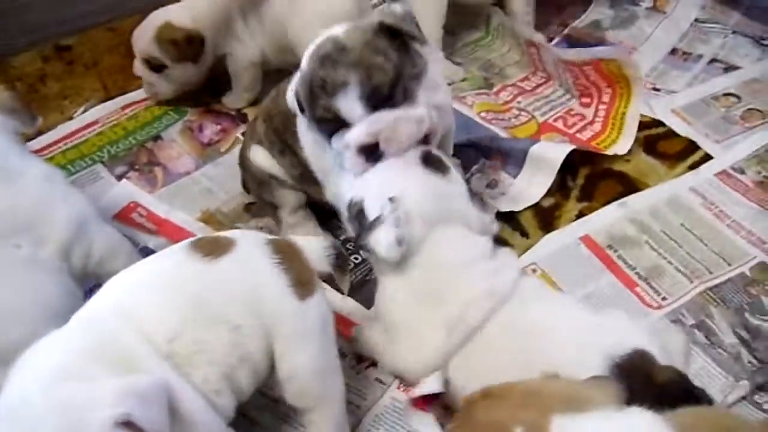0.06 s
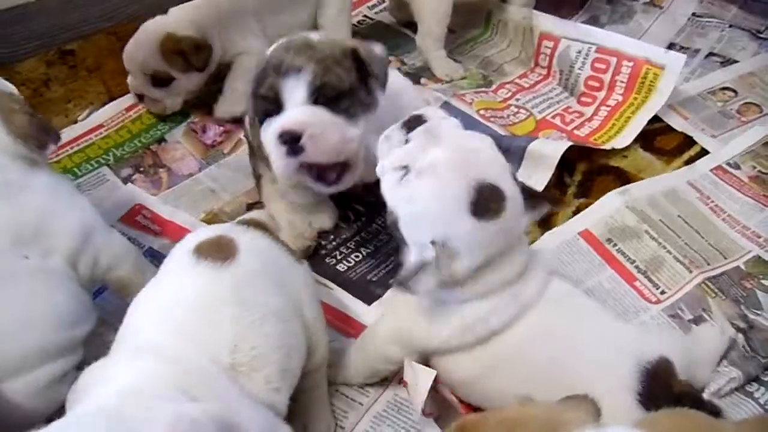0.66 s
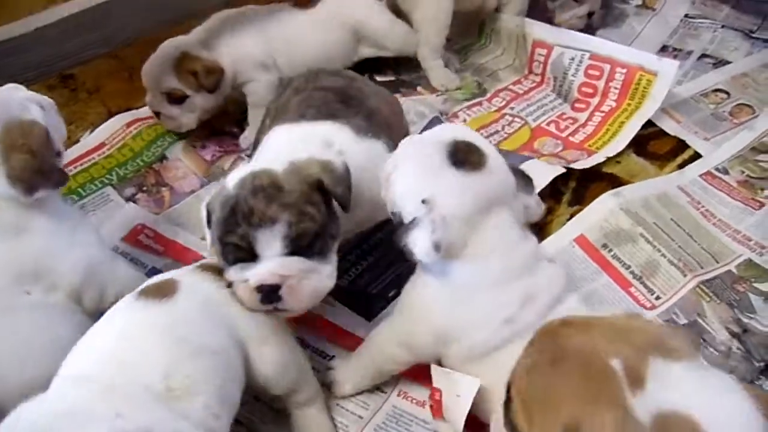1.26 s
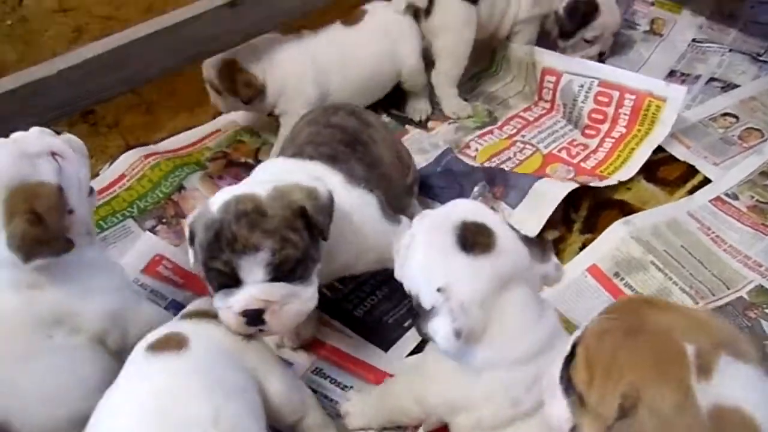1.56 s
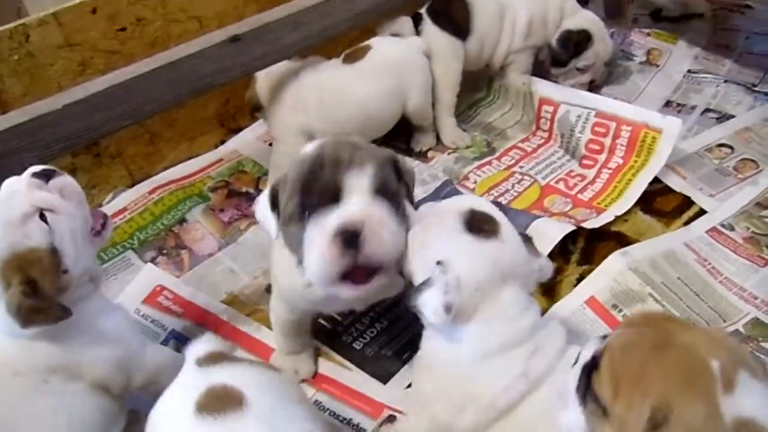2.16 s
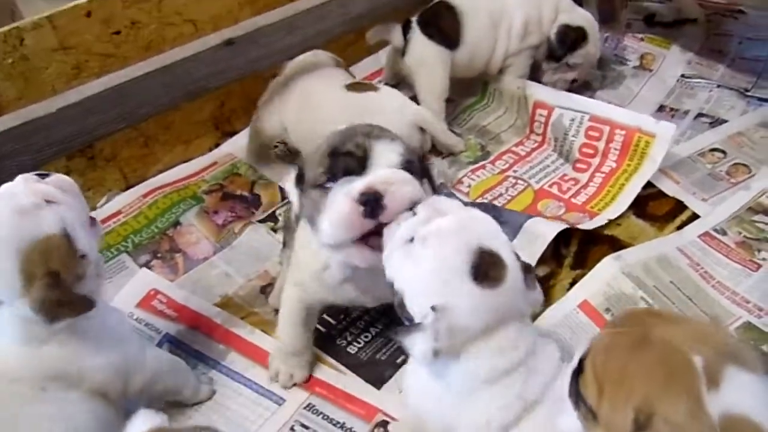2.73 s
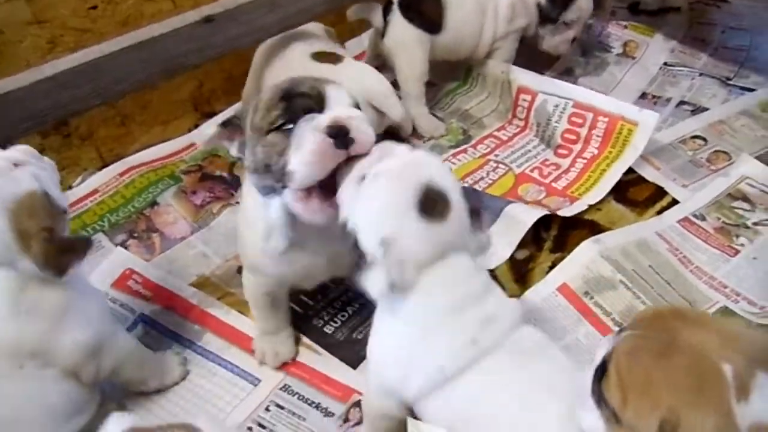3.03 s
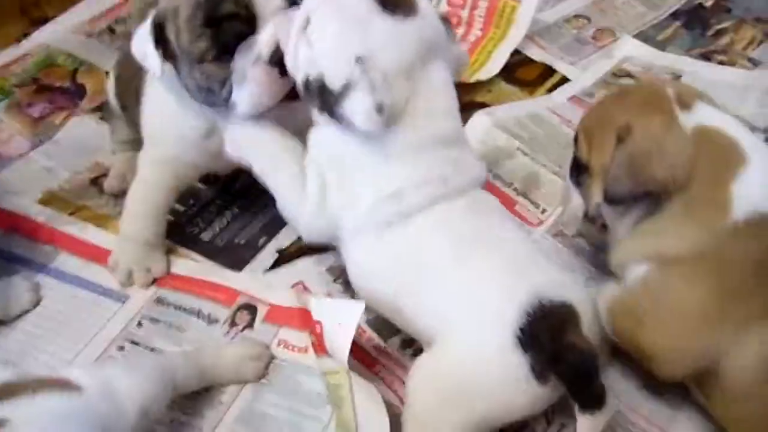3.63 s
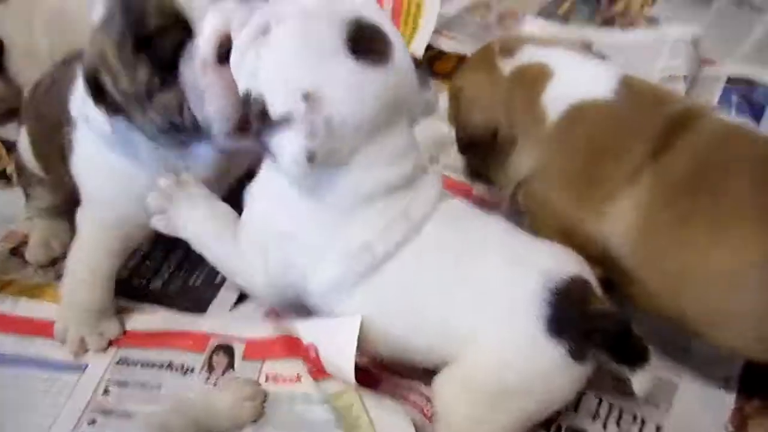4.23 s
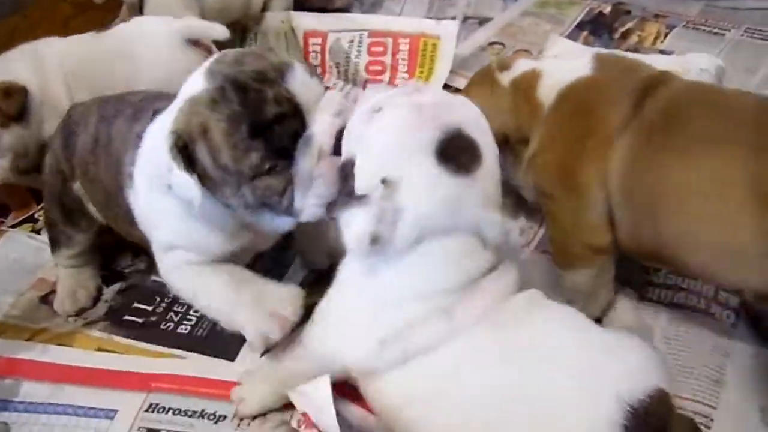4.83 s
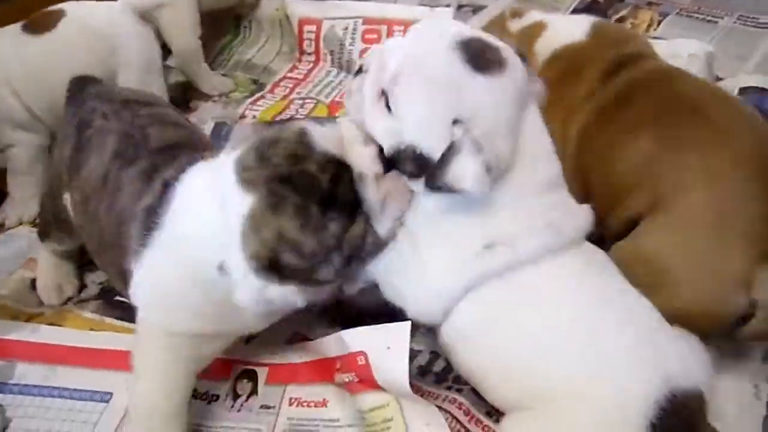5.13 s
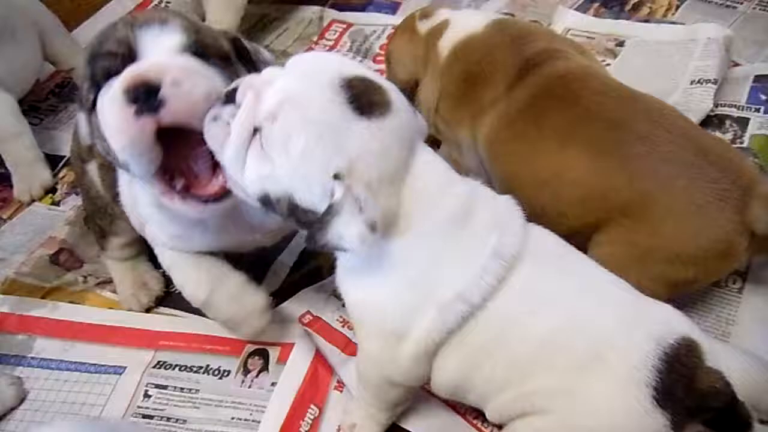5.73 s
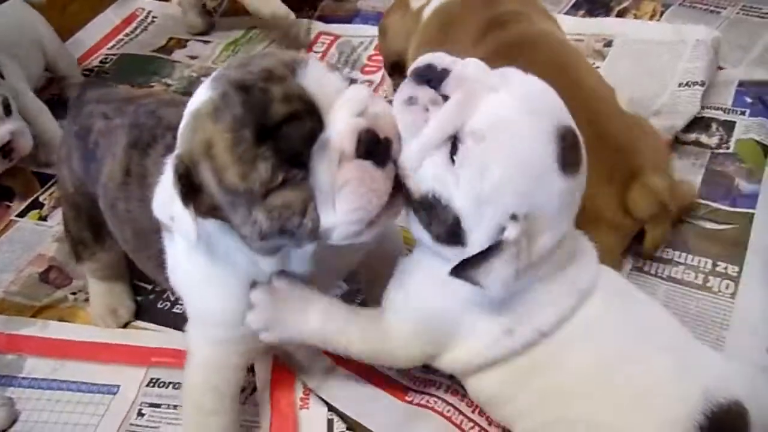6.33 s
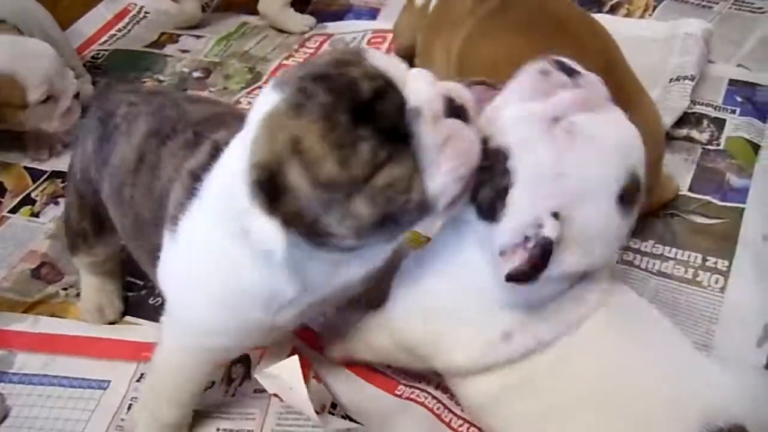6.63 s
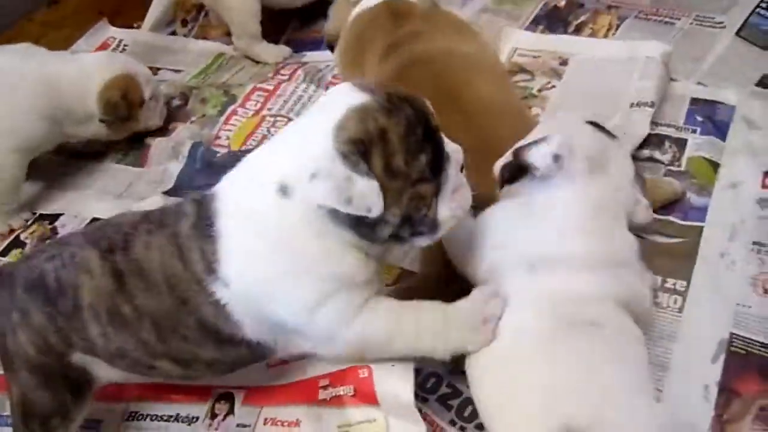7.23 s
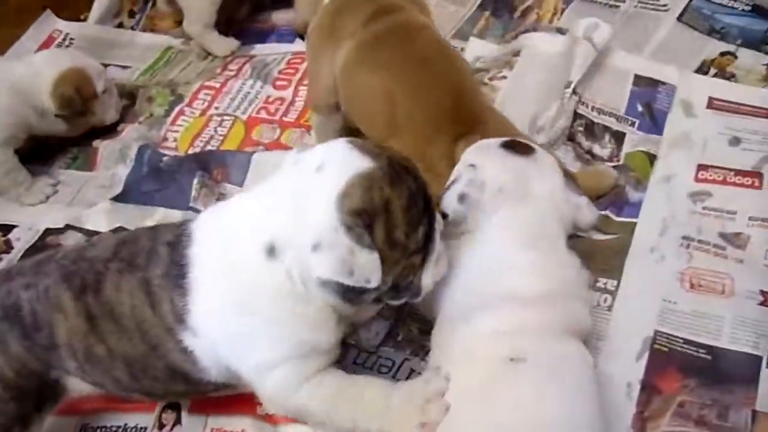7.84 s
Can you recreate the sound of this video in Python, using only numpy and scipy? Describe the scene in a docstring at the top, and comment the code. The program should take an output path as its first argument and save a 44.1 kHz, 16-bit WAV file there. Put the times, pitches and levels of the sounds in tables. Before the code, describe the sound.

Puppies wrestle on newspaper in a box, close by, in a quiet room with a faint hum. Paws scuff and crinkle the paper throughout. A soft growl with a faint squeak opens, then only paper is heard until about 2.5 seconds, when rough, fluttering growls begin in short bouts. Between 3.6 and 4.2 seconds come very near dull bumps, brushing fur and sharp snaps; the snap at 3.8 is the loudest sound. The growls resume around 4 seconds and throb on with small gaps until 7. At 5.8 a brief, high, warbling yelp turns hoarse, followed by two sharp paper cracks with soft thumps. Tiny hoarse squeaks break through from 6.5 to 6.9, where the growl tightens into a short low whine. The rustling grows busier around 7 seconds, with a soft thud, a last growl and a small snap at 7.5. Light crinkling continues to 8 seconds.

```python
"""Fluttering growls, squeaks and crinkling paper: puppies wrestle on newspaper in a box, close by.
Uneven vocal-fold closures make the growl and loose throat tissue breaks it into throbs;
the voice cracks into squeaks and a yelp, and tightens into a whine. Paws scuff and buckle the paper.
Dull bumps, brushing fur and sharp snaps sound very near, over a quiet room with a faint hum."""
import sys
import numpy as np
from scipy import signal
from scipy.fft import rfft, irfft
from scipy.io import wavfile
from scipy.ndimage import uniform_filter1d

SR = 44100
rng = np.random.default_rng(int(sys.argv[2]) if len(sys.argv) > 2 else 0)


def store_wav(level_fs):
    """Save 16-bit WAV to argv[1]."""
    pcm = np.round(np.clip(np.atleast_2d(level_fs), -1, 1) * 32767)
    wavfile.write(sys.argv[1], SR, pcm.T.astype(np.int16))


N = 356769
TIME = np.arange(N) / SR


def from_db(db):
    """Decibels to gain."""
    return 10 ** (np.asarray(db) / 20)


def rms_one(x):
    """Scale to rms 1."""
    return x / np.sqrt(np.mean(x ** 2) + 1e-20)


def even(x, span_s=.012):
    """Level the running rms to 1."""
    span = int(span_s * SR)
    power = uniform_filter1d(uniform_filter1d(x ** 2, span), span)
    return x / np.sqrt(np.abs(power) + 1e-12)


def in_time(rows):
    """Interpolate (time [s], values...) rows at every sample."""
    times_s, *columns = np.transpose(rows)
    return [np.interp(TIME, times_s, column) for column in columns]


def drift(rate_hz):
    """Random wander, rms 1."""
    return rms_one(np.interp(TIME * rate_hz, np.arange(N), rng.standard_normal(N)))


def gate(start_s, end_s, edge_s):
    """1 between two times, with smooth edges."""
    inside_s = np.minimum(TIME - start_s, end_s - TIME)
    return np.sin(np.pi / 2 * np.clip(inside_s / edge_s + .5, 0, 1)) ** 2


def add(out, start_s, sound):
    """Mix in a short sound."""
    i = max(round(start_s * SR), 0)
    out[i:i + len(sound)] += sound[:N - i]


def band(x, low_hz, high_hz, order=2):
    """Butterworth band-pass."""
    edges_hz = np.clip([low_hz, high_hz], 10, SR / 2 - 100)
    return signal.sosfilt(signal.butter(order, edges_hz, "band", fs=SR, output="sos"), x + 1e-18)


def resonate(x, hz, width_hz):
    """One resonance with a moving centre."""
    turn = np.exp(2j * np.pi * np.cumsum(hz) / SR)
    pole = np.exp(-np.pi * width_hz / SR)
    return (turn * signal.lfilter([1], [1, -pole], x / turn)).real


def colour(x, spectrum):
    """Minimum-phase filter of unit power gain, shaped like the spectrum."""
    hz, db = np.transpose(spectrum)
    bins_hz = np.linspace(1, SR / 2, 4097)
    magnitude = rms_one(from_db(np.interp(np.log(bins_hz), np.log(hz), db)))
    cepstrum = irfft(np.log(magnitude))
    cepstrum[1:len(bins_hz) - 1] *= 2
    cepstrum[len(bins_hz):] = 0
    return signal.oaconvolve(x, irfft(np.exp(rfft(cepstrum))))[:N]


def note(pitch_hz, second_db, fall_db):
    """A strong fundamental with three weaker overtones."""
    phase = 2 * np.pi * np.cumsum(pitch_hz) / SR
    overtones = sum(from_db(second_db + fall_db * k) * np.sin((k + 2) * phase) for k in range(3))
    return np.sqrt(2) * (np.sin(phase) + overtones)


def growl(slack_hz=175, mouth_hz=780, snarl_hz=1950, roughness=.52, leap_octaves_per_db=.19,
          release_s=.012, lead_rad=.091):
    """Vocal folds slap shut unevenly; loose throat tissue makes throbs and sways the resonances."""
    # growl bouts (start [s], peak [s], end [s], level [dB], swell [dB], pitch at peak [Hz],
    # mouth [dB re chest], snarl [dB re chest], flutter [Hz], gap depth [dB])
    bouts = [(0, 0.015, 0.13, -49.5, 5, 241.3, -4.5, -17.5, 24.3, 12.5),
             (2.497, 2.514, 2.54, -42, 12, 225, -1, -11, 24.1, 5.5),
             (2.755, 2.909, 3.14, -48, 7, 280.2, -1.5, -9.5, 23.5, 6),
             (3.191, 3.285, 3.43, -41.5, 12.5, 279.3, -4, -11.5, 24.95, 8),
             (3.96, 4.424, 4.5, -46, 5, 239.8, -4.5, -14.5, 22.67, 10),
             (4.49, 4.622, 4.8, -41, 6, 205, -5.5, -12.5, 25.98, 2),
             (4.95, 5.004, 5.03, -48.5, 3, 200.1, -5, -13, 25.01, 8),
             (5.084, 5.217, 5.56, -40.5, 2.5, 230, -4.5, -9.5, 22.93, 14),
             (5.551, 5.572, 5.66, -39.5, 8, 265.3, -3.5, -13.5, 21.95, 5),
             (5.825, 5.965, 6.065, -41.5, 8, 239.5, -1, -7.5, 24.37, 9),
             (6.065, 6.134, 6.31, -41, 7, 235.2, -2, -8.5, 22.39, 15),
             (6.469, 6.599, 6.8, -40, 6, 280.3, -1, -7.5, 25.3, 15),
             (6.779, 6.914, 6.99, -41, 4, 250, 2, -4, 26.56, 4),
             (7.238, 7.295, 7.5, -42, 6, 309.3, -1, -9, 22.04, 15)]
    chest_gain, mouth_gain, snarl_gain, lift, pinch_db, sway, rough = np.zeros((7, N))
    wander_cycles = .0401 * drift(12)
    for start_s, peak_s, end_s, db, swell_db, peak_hz, mouth_db, snarl_db, flutter_hz, gap_db in bouts:
        envelope = gate(start_s, end_s, edge_s=.00992) * np.clip((end_s - TIME) / release_s, 0, 1)
        i = np.flatnonzero(envelope)
        envelope, t = envelope[i], TIME[i]
        effort = np.interp(t, [start_s, peak_s, end_s], [0, 1, 0])
        lift[i] = np.log(peak_hz / slack_hz) * np.sqrt(np.sin(np.pi / 2 * effort))
        ease_db = swell_db * (1 - effort)
        throb_rad = 2 * np.pi * (flutter_hz * (t - peak_s) + wander_cycles[i])
        pinch_db[i] = gap_db * np.sin(throb_rad / 2) ** 4
        chest_gain[i] += envelope * from_db(db - ease_db - pinch_db[i])
        # the mouth throbs less deeply, just ahead of the chest
        mouth_pinch_db = .67 * gap_db * np.sin((throb_rad + lead_rad) / 2) ** 4
        opening = envelope * from_db(db - .65 * ease_db - mouth_pinch_db)
        mouth_gain[i] += opening * from_db(mouth_db)
        snarl_gain[i] += opening * from_db(snarl_db)
        sway[i], rough[i] = -np.sin(throb_rad), roughness
    jitter = .25 * rough * (drift(260) + drift(50))
    # pitch leaps as the throat pinches shut between throbs
    pitch_hz = slack_hz * np.exp(lift + jitter) * 2 ** (leap_octaves_per_db * pinch_db)
    cycles = np.cumsum(pitch_hz) / SR
    closures = np.diff(np.floor(cycles), prepend=0) * np.sqrt(SR / pitch_hz)
    strength = from_db(6 * rough * drift(400))
    breath = .32 * rough * rng.standard_normal(N) * np.exp(-2 * (cycles % 1))
    source = closures * strength + breath
    airflow = .27 * strength * np.cos(2 * np.pi * cycles)
    chest = even(even(band(source, 125, 460, order=3)) + airflow)
    # both upper resonances slide down through each throb
    vowel = np.exp(.24 * sway + .28 * drift(70))
    mouth = even(resonate(band(source, 510, 1070, order=5), mouth_hz * vowel, width_hz=480))
    snarl = even(resonate(band(source, 1300, 2350, order=4), snarl_hz * np.sqrt(vowel), width_hz=650))
    return mouth_gain * mouth + snarl_gain * snarl - chest_gain * chest


def squeaks(waver=.055, shake_db=4, rasp_db=-9):
    """The voice cracks into short, hoarse, shaky gliding notes."""
    # voice cracks (start [s], length [s], mid pitch [Hz], glide [octaves], level [dB])
    notes = [(0, .2, 500, -0.17, -56), (5.062, 0.023, 620, -0.28, -44), (6.499, 0.018, 848, 0.19, -40.5),
             (6.538, 0.014, 867, 0.022, -34.5), (6.576, 0.016, 863, -0.0088, -37),
             (6.658, 0.016, 674, 0.31, -36.5), (6.7, 0.017, 706, 0.14, -38.5),
             (6.753, .018, 631.5, -0.031, -36), (6.877, 0.031, 1950, 0.44, -39)]
    out = np.zeros(N)
    wobble = 1 + waver * drift(700)
    shake = from_db(shake_db * drift(300))
    for start_s, length_s, hz, glide_octaves, db in notes:
        position = np.linspace(-.5, .5, int(length_s * SR))
        pitch_hz = hz * 2 ** (glide_octaves * position) * wobble[int(start_s * SR):][:len(position)]
        arch = np.sqrt(1 - (2 * position) ** 2)
        add(out, start_s, from_db(db) * note(pitch_hz, second_db=-11, fall_db=-11) * arch)
    rasp = from_db(rasp_db) * rms_one(band(rng.standard_normal(N), 160, 880))
    return band(out * (shake + rasp), 450, 2250)


def paw_strokes(treble_share):
    """Rustle gain in one band: each sliding paw swells and fades."""
    # paw slides (middle [s], length [s], level [dB], treble [dB re body])
    strokes = [(0, .17, -47.5, -3), (.223, .15, -50.5, -3), (0.495, .06, -50, -3), (0.711, .05, -49.5, 2),
               (1.23, 0.26, -50, -1.5), (1.5, 0.18, -51, 3), (1.86, 0.16, -51, 0), (2.3, 0.066, -54.5, 7),
               (2.437, 0.032, -46, -3), (2.546, 0.17, -51.5, -1), (2.715, 0.084, -54.5, 10),
               (3.09, 0.066, -50, 8), (3.468, 0.094, -47.5, -3), (3.69, 0.067, -46, -5),
               (4.425, 0.057, -49.5, 6), (4.642, .13, -49.5, 3), (5.15, 0.35, -47.5, -1),
               (5.91, 0.38, -49, 2), (6.37, 0.092, -52.5, 2), (6.628, .08, -48, 2), (6.872, .07, -43.5, 4),
               (7.817, 0.058, -50.5, 7)]
    power = 0
    for middle_s, length_s, db, treble_db in strokes:
        swell = np.exp(-(2 * (TIME - middle_s) / length_s) ** 2)
        power += (from_db(db + treble_share * treble_db) * swell) ** 2
    return np.sqrt(power)


def rustle(cracks_per_s=330, clump_db=5.2, ring_s=.0016, split_hz=3200, gain_db=-6):
    """Sliding sheets hiss; clumps of small cracks each ring one patch of paper."""
    # the litter shuffling on the paper (time [s], level [dB])
    shuffle_curve = [(.82, -56.5), (.93, -67), (1.05, -57), (2.7, -59.5), (3.4, -55.5), (4.2, -63.5),
                     (5.5, -52), (6.2, -60), (7.05, -48), (7.42, -50), (7.74, -61), (7.95, -53)]
    # paper spectrum (frequency [Hz], relative density [dB])
    paper_spectrum = [(100, 1), (450, 4.5), (1400, 0.5), (2200, 1), (3200, -6.5), (4800, -4), (7500, -12),
                      (9500, -16.5), (12000, -13), (16000, -44)]
    shuffle = from_db(in_time(shuffle_curve)[0])
    patches_hz = np.geomspace(1700, 9000, 6)
    clumps = from_db(clump_db * np.clip(drift(70), -2, 2))
    onsets = rng.random(N) < cracks_per_s * clumps / SR
    clicks = onsets * from_db(5 * np.minimum(rng.exponential(1, N), 3))
    patch = rng.integers(0, len(patches_hz), N)
    cracks, t = np.zeros(N), TIME[:SR // 50]
    for k, hz in enumerate(patches_hz):
        ring = band(rng.standard_normal(len(t)) * np.exp(-t / ring_s), hz / 2, hz * np.sqrt(2), order=1)
        cracks += signal.oaconvolve(clicks * (patch == k), ring)[:N]
    hiss = rms_one(rng.standard_normal(N) * np.sqrt(clumps))
    texture = rms_one(cracks) + hiss
    paper = 0
    for kind, treble_share in ("lowpass", -.5), ("highpass", .5):
        sheet = texture * np.hypot(shuffle, paw_strokes(treble_share))
        paper += signal.sosfilt(signal.butter(3, split_hz, kind, fs=SR, output="sos"), sheet)
    return from_db(gain_db) * colour(paper, paper_spectrum)


def background(air_db=-58, hum_db=-67.5, hum_hz=103.5):
    """Still air, a wavering hum and the rumble of handling."""
    # room air spectrum (frequency [Hz], relative density [dB])
    air_spectrum = [(30, -1.5), (118, -7), (174, -3), (374, -11.5), (900, -11), (2200, -20.5),
                    (3500, -20.5), (8000, -24), (12000, -29), (16000, -32.5)]
    # handling rumble (time [s], level [dB])
    rumble_curve = [ (2.6, -63.5), (3.6, -54), (6.4, -63.5)]
    air = from_db(air_db) * colour(rng.standard_normal(N), air_spectrum)
    hum_rms = from_db(hum_db + 2 * drift(6.3))
    hum_rad = 2 * np.pi * np.cumsum(hum_hz + .82 * drift(4.9)) / SR
    rumble = from_db(in_time(rumble_curve)[0]) * rms_one(band(rng.standard_normal(N), 22, 46))
    return air + hum_rms * np.sqrt(2) * np.sin(hum_rad) + rumble


def crinkles(crack_s=.0018, settle_s=.0073, settle_db=-14, broad_db=-2, gain_db=.5):
    """A crease buckles with a short crack; the sheet around it settles."""
    # buckling creases (time [s], level [dB])
    creases = [(.053, -37.5), (.16, -32.5), (.254, -39), (.364, -37.5), (.498, -30), (.984, -40),
               (1.053, -39.5), (1.137, -37), (1.194, -38.5), (1.291, -35.5), (1.439, -36.5), (1.503, -36.5),
               (1.606, -36.5), (1.67, -38), (1.779, -34), (1.858, -35.5), (1.941, -36), (2.082, -35.5),
               (2.293, -35.5), (2.509, -33), (2.588, -38), (3.014, -31.5), (3.104, -35), (3.261, -25.5),
               (3.305, -33), (3.365, -33.5), (3.429, -36.5), (3.498, -35), (3.552, -40), (3.971, -33),
               (4.053, -38.5), (4.815, -38.5), (4.96, -33), (5.07, -33), (5.428, -32.5), (5.653, -31.5),
               (5.689, -33.5), (5.86, -21.5), (5.978, -21.5), (6.138, -36), (6.28, -38), (6.677, -32),
               (6.755, -35), (6.921, -30.5), (7.003, -27.5), (7.059, -37), (7.089, -34), (7.127, -29),
               (7.137, -32), (7.317, -33), (7.596, -36), (7.653, -35.5), (7.83, -36.5), (7.85, -37),
               (7.912, -37), (7.973, -37.5), (7.987, -37)]
    out, t = np.zeros(N), TIME[:SR // 16]
    decay = np.exp(-t / crack_s) + from_db(settle_db) * np.exp(-t / settle_s)
    for start_s, db in creases:
        hz = 2250 * 2 ** (.04 * (db + 35) + .29 * rng.standard_normal())  # harder is brighter
        burst = rng.standard_normal(len(t)) * decay
        crack = band(burst, hz / np.sqrt(2), hz * np.sqrt(2))
        crack += from_db(broad_db) * band(burst, 1200, 5230)
        add(out, start_s, from_db(db + gain_db) * crack / np.abs(crack).max())
    return out


def bumps(t60_s=.022, overtone_ratio=1.59, overtone_db=-7, scuff_db=-11, scuff_s=.0054):
    """Soft blows: a few damped low cycles with a little scuff."""
    # bumps and paw falls (time [s], level [dB], pitch [Hz])
    blows = [(1.146, -39, 620), (1.778, -39, 420), (3.6413, -18.5, 368), (3.6485, -25.5, 437),
             (3.665, -26, 564), (3.838, -24, 596), (3.892, -16, 337.3), (4.144, -20, 544),
             (5.862, -24, 188), (5.978, -27.5, 247), (7.119, -30.5, 149)]
    out, t = np.zeros(N), TIME[:SR // 20]
    decay = from_db(-60 * t / t60_s)
    for start_s, db, hz in blows:
        phase = 2 * np.pi * hz * t
        thud = (np.sin(phase) + from_db(overtone_db) * np.sin(overtone_ratio * phase)) * decay
        scuff = from_db(scuff_db) * rng.standard_normal(len(t)) * np.exp(-t / scuff_s)
        add(out, start_s, from_db(db) * (thud + scuff))
    return band(out, 144, 3710)


def brushes():
    """Fur sweeps past: a brief hiss that swells and fades."""
    # fur sweeps (start [s], length [s], level [dB])
    sweeps = [(3.628, 0.024, -42.5), (3.721, 0.033, -40.5), (3.749, 0.093, -39.5), (4.142, 0.023, -40.5)]
    # fur spectrum (frequency [Hz], relative density [dB])
    fur_spectrum = [(1000, 9), (1700, -3), (2400, 2), (5500, -5.5), (7300, 5.5), (8800, -15), (10800, -19),
                    (16000, -30)]
    envelope = sum(from_db(db) * np.sin(np.pi * np.clip((TIME - start_s) / length_s, 0, 1))
                   for start_s, length_s, db in sweeps)
    return envelope * colour(rng.standard_normal(N), fur_spectrum)


def snaps(rise_s=.00082, grit_db=-14, grit_s=.0011):
    """Hard, very short contacts ring a few modes, higher or lower with each touch."""
    # contacts (time [s], level [dB], tilt [dB/octave], pitch [ratio])
    contacts = [(3.7997, -4, -0.5, 1.006), (3.9250, -17.5, 3, 1.1), (3.9263, -12.5, 0.5, 0.96),
                (3.929, -21, -11, 0.99), (7.474, -21.5, 3.5, 1.085), (7.475, -21.5, -10, 0.97)]
    # ringing modes (frequency [Hz], level [dB], t60 [s])
    modes = [(670, -13, 0.0046), (1287, -12.5, 0.015), (2274, 2.5, 0.012), (2520, -9, 0.014),
             (3730, -3.5, .013), (4040, 2, 0.0078), (6190, 6.5, 0.0045), (6720, -9, 0.0094)]
    out, t = np.zeros(N), TIME[:SR // 30]
    hz, mode_db, t60_s = np.array(modes).T[:, :, None]
    for start_s, db, tilt_db_per_octave, ratio in contacts:
        decays = from_db(mode_db + tilt_db_per_octave * np.log2(hz / 2000) - 60 * t / t60_s)
        partials = decays * np.sin(2 * np.pi * ratio * hz * t)
        ring = partials.sum(axis=0) * (1 - np.exp(-t / rise_s))
        grit = from_db(grit_db) * rng.standard_normal(len(t)) * np.exp(-t / grit_s)
        add(out, start_s, from_db(db) * (ring / np.abs(ring).max() + grit))
    return band(out, 210, 12000)


def yelp(waver=.0354, shake_db=1.5, rasp_db=-13, hoarsening_db=7):
    """The high voice warbles, growing hoarser as it falls."""
    # yelp contour (time [s], pitch [Hz], level [dB])
    contour = [(5.781, 1015, -38.5), (5.793, 793, -31), (5.804, 900, -41), (5.809, 827, -37),
               (5.818, 906, -30), (5.832, 745, -49), (5.847, 845, -35.5), (5.865, 780, -45),
               (5.875, 852, -41), (5.89, 792.6, -39.5), (5.902, 743.5, -44)]
    start_s, end_s = contour[0][0], contour[-1][0]
    pitch_hz, db = in_time(contour)
    hoarse = from_db(np.interp(TIME, [start_s, end_s], [0, hoarsening_db]))
    tone = note(pitch_hz * (1 + waver * hoarse * drift(600)), second_db=-11, fall_db=-6)
    pulsed_noise = rng.standard_normal(N) * np.maximum(tone, 0)
    rasp = from_db(rasp_db) * hoarse * rms_one(band(pulsed_noise, 720, 2900))
    voice = (tone + rasp) * from_db(db + shake_db * drift(400))
    return band(voice * gate(start_s, end_s, edge_s=.0045), 420, 2900)


def whine(waver=.03):
    """The growl tightens into a clear, low note."""
    # whine contour (time [s], pitch [Hz], level [dB])
    contour = [(6.838, 385, -38), (6.866, 455, -41), (6.885, 400, -40), (6.905, 455, -41),
               (6.932, 375, -38), (6.962, 320, -46)]
    pitch_hz, db = in_time(contour)
    tone = note(pitch_hz * (1 + waver * drift(250)), second_db=-7, fall_db=-11)
    return tone * from_db(db) * gate(contour[0][0], contour[-1][0], edge_s=.008)


def box_echo(x, wet_db=-12, t60_s=.2, delay_s=.003):
    """Quickly dying reflections from the box and the room."""
    t = TIME[:SR // 2]
    tail = rng.standard_normal(len(t)) * (t > delay_s) * from_db(-60 * t / t60_s)
    echoes = band(tail, 96, 14300, order=1)
    return from_db(wet_db) * signal.oaconvolve(x, echoes / np.linalg.norm(echoes))[:N]


def scene():
    """Voices and paper echo in the box; the nearest contacts stay dry."""
    in_box = growl() + squeaks() + whine() + yelp() + rustle() + crinkles()
    return (in_box + box_echo(in_box) + snaps() + bumps() + brushes() + background())[None]


def record(dry):
    """Steep low-pass on the top treble."""
    cutoff_hz = 16100
    return signal.sosfilt(signal.ellip(10, .1, 70, cutoff_hz, fs=SR, output="sos"), dry)


dry = scene()
out = record(dry)
store_wav(out)
```